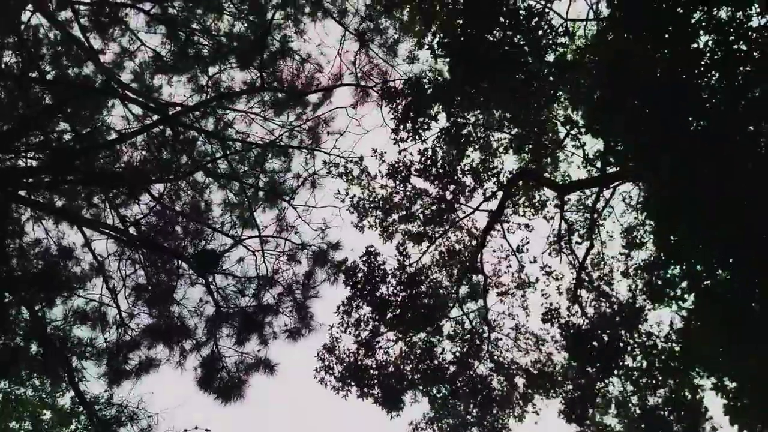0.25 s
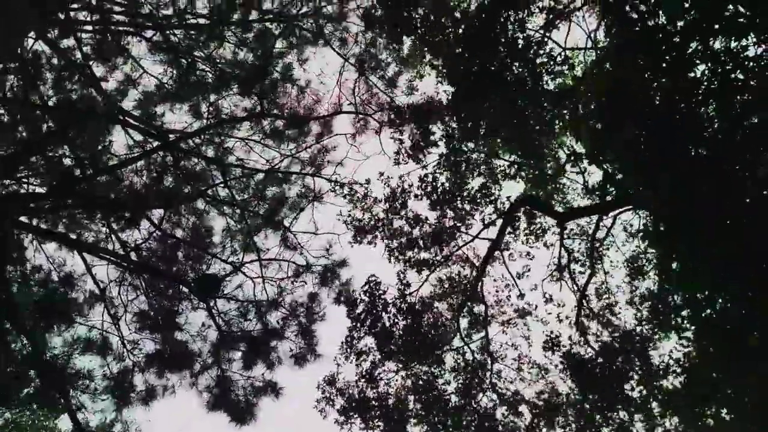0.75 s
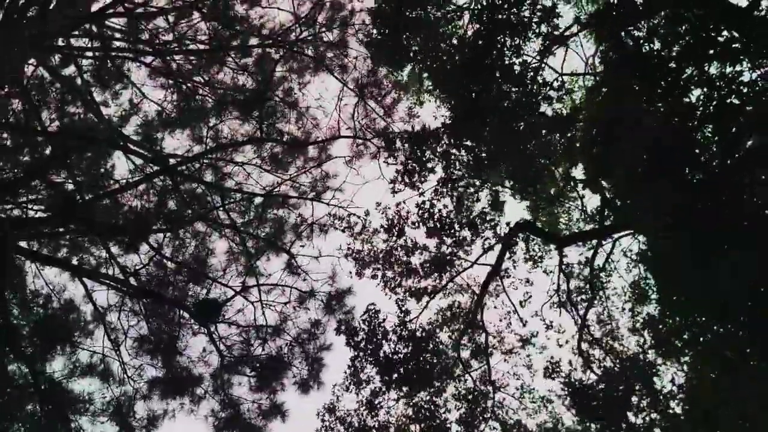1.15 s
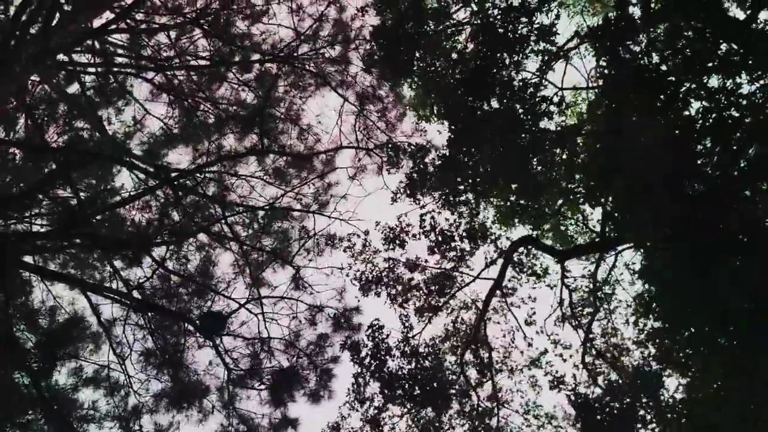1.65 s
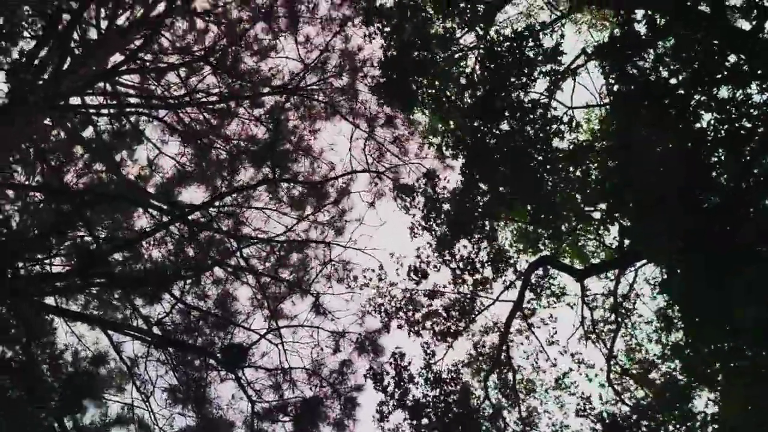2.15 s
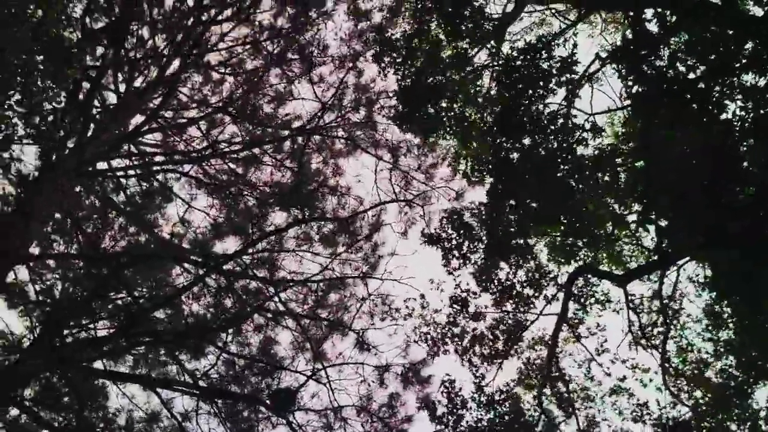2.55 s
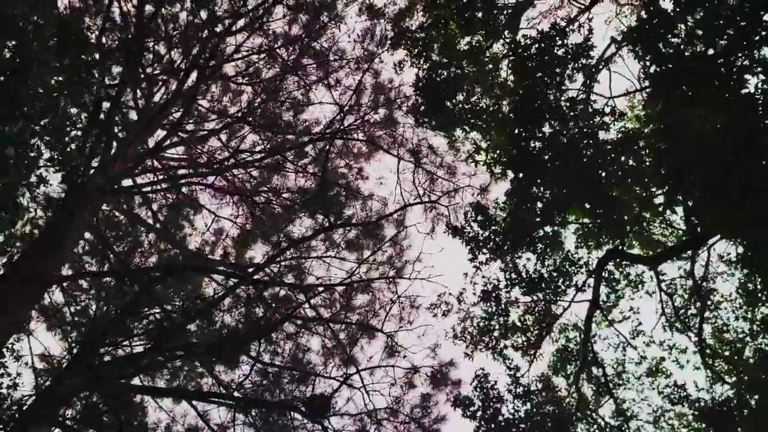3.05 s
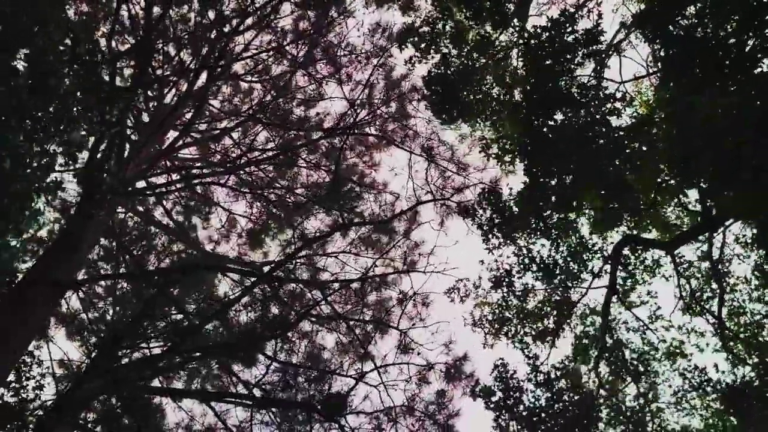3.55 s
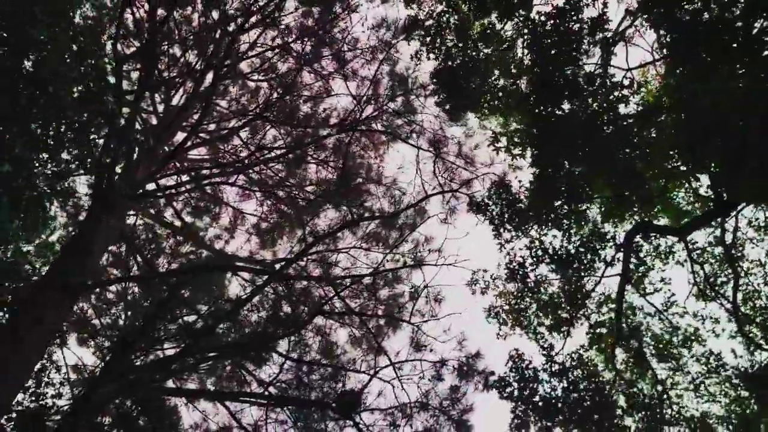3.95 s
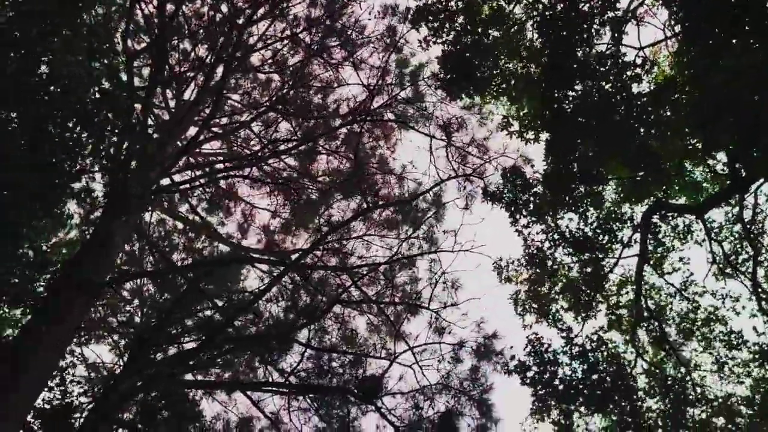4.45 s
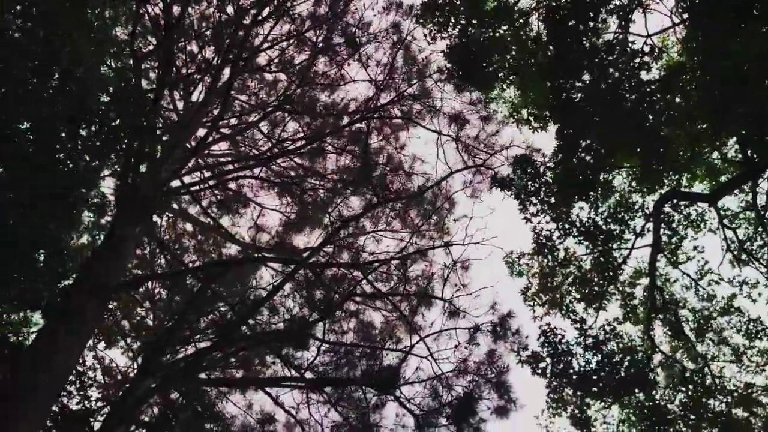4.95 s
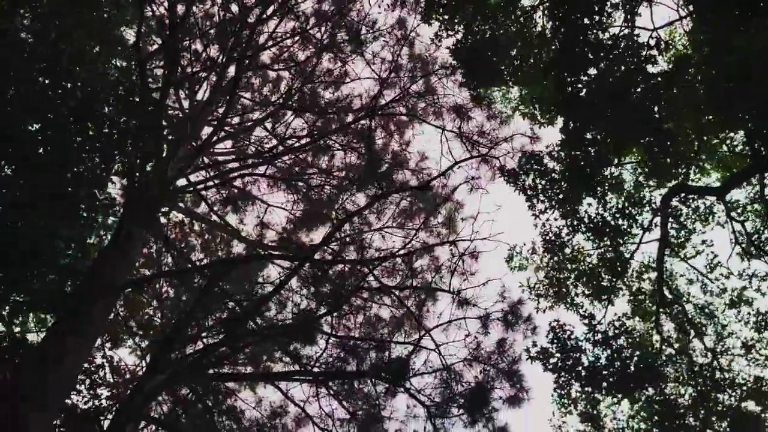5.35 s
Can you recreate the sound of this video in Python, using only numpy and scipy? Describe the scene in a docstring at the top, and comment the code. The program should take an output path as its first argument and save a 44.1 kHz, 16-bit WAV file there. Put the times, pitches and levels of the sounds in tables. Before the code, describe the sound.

A burst of deep, soft wind thumps opens, then thins. Loud dry clicks of raindrops hit the microphone casing at irregular moments, with notable ones near half a second, 1.4, 1.8 and 4 seconds, among fainter pats and tiny ticks. Quiet steady leaf rush surrounds them; the open-air sound is very close and wide, without echo.

```python
"""Storm wind under tall trees, taken from the ground: gusts buffet the two-port microphone and the crowns rush.
Wind is shaped stereo noise: low rumble that swells with each gust, and a broad rush with thin hiss above.
Raindrops land on the recorder's own housing: each is a dry tick, earlier and usually louder at the nearer port,
with a short spray and a ring of the struck panel. Faint fine drops, soft case bumps and one high fizz lie
behind. A fast limiter holds down the loudest moments."""
import sys
import numpy as np
from scipy import signal
from scipy.fft import rfft, irfft, next_fast_len
from scipy.io import wavfile
from scipy.ndimage import uniform_filter1d, minimum_filter1d, map_coordinates

SR = 44100
rng = np.random.default_rng(int(sys.argv[2]) if len(sys.argv) > 2 else 0)


def transcribe(signal):
    """Save signal, clipped to [-1, 1], as a 16-bit WAV file at the path in sys.argv[1]."""
    frames = np.atleast_2d(signal).T
    limited = np.clip(frames, -1, 1)
    pcm = np.round(limited * 32767).astype(np.int16)
    wavfile.write(sys.argv[1], SR, pcm)


N = 247106

# Gusts at the microphone. Each row: crest in seconds, buffeting in dB, length in seconds, left over right in dB.
GUSTS = [(0, -31, 0.11, -5), (0.436, -28.5, 0.1, 6), (0.61, -34.5, 0.18, 3.5), (0.858, -35.5, 0.063, 3),
         (1.035, -47.5, 0.062, 9), (1.803, -43.5, 0.1, 8), (1.954, -31.5, 0.099, 8), (2.464, -42, 0.11, -3),
         (2.724, -38.5, 0.1, 9), (2.935, -42, 0.064, 15), (3.346, -31.5, .085, -5.5), (3.55, -40, 0.069, 0),
         (3.832, -42, 0.1, 12), (5.255, -37.5, 0.054, 7), (5.6, -45, .1, 12)]
# Slowly changing breeze under the gusts. Each row: time in seconds, buffeting in dB.
BREEZE = [(0, -34), (0.28, -44.5), (0.7, -45), (1.15, -48), (1.5, -52.5), (1.8, -44), (2.3, -48),
          (2.9, -45.5), (3.65, -48.5), (4.0, -45.5), (4.2, -53), (5.0, -50.5), (5.6, -44.5)]
# Relative spectrum of the buffeting. Each row: frequency in Hz, density in dB.
BUFFET_SPECTRUM = [(15, -6.5), (25, -4.5), (45, -1.5), (64, 1), (95, -4.5), (125, -9.5), (155, -9.5),
                   (230, -23), (400, -40), (900, -95)]
# Wind up in the crowns. Each row: time in seconds, rush in dB before a fixed lift and a random wobble.
CROWN_LEVELS = [(0.0, -45), (0.5, -47.5), (1.64, -49.5), (2.35, -50.5), (3.9, -47.5), (4.1, -49.5),
                (5.6, -50)]
# Relative spectrum of the rush in the branches. Each row: frequency in Hz, density in dB.
RUSH_SPECTRUM = [(40, -15), (95, -10), (120, 14), (145, -3), (280, -2), (500, -4.5), (690, -1), (870, -4.5),
                 (1180, -2), (1700, -8), (2500, -13.5), (3350, -9.5), (5000, -23.5), (9000, -43.5)]
# Relative spectrum of the thin hiss. Each row: frequency in Hz, density in dB.
HISS_SPECTRUM = [(3000, -51), (6500, -75), (8500, -9.5), (10000, -6.5), (12500, 3.5), (14300, -1),
                 (16000, -1.5)]
# Likeness of the crowns at the two ports. Each row: frequency in Hz, left-right correlation from 0 to 1.
PORT_LIKENESS = [(150, .9), (380, .77), (950, .22), (2400, 0), (15000, 0)]
# Balance of the crowns between the ports. Each row: frequency in Hz, left over right in dB.
PORT_BALANCE = [(150, -0.5), (400, 1), (950, -4.5), (2400, -3.5), (6000, 2.5), (13000, -5)]
# Drops on the housing. Each row: start in seconds, tick level in dB, left over right in dB, lag of the far port
# in ms, brightness in dB per octave, snap in dB, panel ring in Hz, ring in dB relative to the tick level.
DROPS = [(0.1725, -5.5, -8, 0.44, -4.5, 6.5, 397, -50), (0.3718, -19, 18, .3, -1.5, 2, 300, -19),
         (0.379, -11.5, 18, 0.42, -2.5, -11, 766, -14), (0.4895, 8.5, 6.5, .05, 3, -0.5, 448, -20),
         (0.5358, -17, -10, .05, -0.5, -9, 298, -14), (0.684, -13.5, 4, .08, 2.5, 4.5, 290, -18.5),
         (0.8431, 1, 24, 0.28, -2, -8, 700, -17), (0.8837, -10, -4.5, 0.22, 1.5, 3.5, 298, -21),
         (0.9074, -11, -6.5, 0.33, 0, -5, 740, -22), (1.1034, -15, -0.5, 0.22, -1.5, 2, 1220, -5),
         (1.3727, 5.5, 6, 0.53, 0.8, -3, 418, -14.5), (1.6806, -23.5, 6, 0.37, -5, 10, 905, -16),
         (1.7925, 1, 11.5, 0.44, 6.5, -2, 298, -25), (2.1351, -26, 0, 0.29, -5, 3, 1220, 1),
         (2.3358, -18, 14, .05, -2.5, -7, 1510, -39), (2.4268, -4, -7, .05, 4.5, -1.5, 1070, -3.5),
         (2.6385, -18.5, 21, 0.49, -3, -13, 930, -20), (2.852, -6, 7, 0.36, -2.5, 3.5, 775, -21),
         (3.2023, -25, 2, 0.26, 3, -16, 2130, 1.5), (3.6295, -9.5, -12, 0.095, 4, 1.5, 332, -20),
         (3.7793, -25.5, 20, 0.29, 7, 3, 1320, 0.5), (4.0395, -17, 15, 0.18, 6, -10, 1030, 1),
         (4.0544, 2.5, 3.5, 0.6, 2, -2, 508, -3.5), (4.1014, -21, 5, 0.27, -3.5, 0, 1130, -18),
         (4.1478, -12.5, 13, 0.2, -0.5, -7, 655, -15), (4.9338, -25.5, -3.5, 0.26, 6.5, -8, 895, -11),
         (5.2217, -18.5, -6.5, 0.25, 4, -2.5, 1320, -30), (5.3864, -14, 13, 0.57, 0, -6, 333, -15),
         (5.3957, -20.5, 13, 0.4, 0.5, -7, 306, -17.5), (5.4671, -27, 0, 0.26, -6, 2, 1150, 1.5),
         (5.5672, -20.5, 11, 0.2, -3, -27, 2730, -12)]
# The housing's answer to a drop. Each row: frequency in Hz, relative level in dB.
IMPACT_SPECTRUM = [(60, -12), (200, -15), (380, -3), (750, 3.5), (1600, 1), (2300, -6.5), (3300, -8),
                   (4800, -24), (6500, -36.5), (8000, -31), (10000, -43), (12500, -27.5), (16000, -49)]
# Soft bumps of the case. Each row: start in seconds, peak in dB, pitch in Hz.
BUMPS = [(1.301, -34, 316), (3.032, -38.5, 243), (4.524, -42, 275)]


def buffeting():
    """Gusts swell and fade over the breeze, most pressing harder on one port; eddies make the whole flutter."""
    rise, fall = 0.45, 0.54  # shares of a gust's length: it builds faster than it fades
    eddy_db, eddies_per_s = 1.5, 12
    t = np.arange(N) / SR
    breeze_db, = curves(BREEZE)
    power = np.ones((2, 1)) * amp(breeze_db) ** 2
    for crest_s, db, length_s, lean_db in GUSTS:
        width_s = length_s * np.where(t < crest_s, rise, fall)
        swell = np.exp(-((t - crest_s) / width_s) ** 2)
        port_db = db + np.array([[lean_db], [-lean_db]]) / 2
        power = power + swell * amp(port_db) ** 2
    # the lowest rumble is nearly the same at both ports
    rumble = airy(BUFFET_SPECTRUM, [(40, 1.0), (80, 0.98), (150, 0.69)], patchy_db=1.4)
    # level out the rumble's own slow swings, so that gusts, breeze and flutter set its strength
    strength = np.sqrt(np.abs(uniform_filter1d(np.mean(rumble ** 2, axis=0), size=4000)) + 1e-6)
    flutter = amp(eddy_db * wobble(eddies_per_s))
    return rumble / strength * np.sqrt(power) * flutter


def crowns():
    """Branches rush in the wind, with a thin hiss on top that follows the slow course of the rush."""
    hiss_db, hiss_fade_db_per_s = -11, 0.28  # against the rush's slow course; the hiss thins with time
    level_db, = curves(CROWN_LEVELS)
    rush_gain = amp(level_db + 1.5 + 0.57 * wobble(3.7))
    rush = rush_gain * airy(RUSH_SPECTRUM, PORT_LIKENESS, patchy_db=1.38)
    hiss_gain = amp(level_db + hiss_db - hiss_fade_db_per_s * np.arange(N) / SR)
    hiss = hiss_gain * airy(HISS_SPECTRUM, PORT_LIKENESS, patchy_db=0.3)
    sides = np.array([1, -1])[:, None]
    return filtered(rush + hiss, lambda hz: amp(sides * along(PORT_BALANCE, hz) / 2))


def splashes(rows):
    """Each drop reaches the nearer port first, then the far one; the struck panel rings into both."""
    through_case_s = 0.0011
    out = np.zeros((2, N))
    for s, db, lean_db, lag_ms, bright_db, snap_db, ring_hz, ring_db in rows:
        near = int(lean_db < 0)  # 0 is the left port
        later = s + lag_ms / 1000
        add(out[near], s, amp(db) * tick(bright_db, snap_db))
        # the spray reaches both ports alike in level and time
        for port in out:
            add(port, s, amp(db + 0.6 * bright_db - 43) * spatter())
        far = amp(db - abs(lean_db)) * tick(bright_db, snap_db)
        add(out[1 - near], later, far)
        # a slower wave through the case knocks at the far port once more
        add(out[1 - near], s + through_case_s, amp(-14.5) * far)
        panel = amp(db + ring_db) * ring(ring_hz, cycles=3.3)
        # the right port sits closer to the flexing panel
        add(out[0], later, amp(-13.5) * panel)
        add(out[1], later, panel)
    return out


def tick(bright_db, snap_db, size=1024):
    """One impact: fast drops are brighter, direct hits snap in the port, and each spot sounds a little different."""
    hz = np.fft.rfftfreq(size, 1 / SR)
    octaves = np.log2(np.clip(hz, 350, 3500) / 1000)
    port = np.exp(-(np.log2((hz + 1) / 3100) / 0.45) ** 2)  # resonance near 3100 Hz
    knots = np.geomspace(200, 16000, num=24)
    ripple_db = np.interp(hz, knots, rng.normal(0, 1.6, len(knots)))
    return causal(along(IMPACT_SPECTRUM, hz) + bright_db * octaves + snap_db * port + ripple_db)


def spatter(t60=0.011, size=512):
    """The drop bursts into a very short, bright spray: differenced noise that falls 60 dB in t60 seconds."""
    decay = amp(-60 * np.arange(size) / SR / t60)
    return np.diff(rng.standard_normal(size + 1)) * decay


def ring(hz, cycles, size=2048):
    """The case flexes: it swells over about a cycle and dies after a few; the air follows its speed."""
    turns = hz * np.arange(size) / SR
    decay = amp(-60 * turns / cycles)
    bend = np.sin(2 * np.pi * turns) * decay * (1 - np.exp(-turns)) ** 2
    wave = np.gradient(bend)
    return wave / np.abs(wave).max()


def droplets(count=56):
    """Fine drops land on the housing at random moments, most of them very faint."""
    faintest_db, range_db = -36.5, 8.5
    width_db, bright_range_db = 26, 10  # left-right spread; brightness spread per octave
    lowest_hz, range_hz = 500, 900  # panel ring
    rows = []
    for when, weight, side, speed, spot in rng.random((count, 5)):
        db = faintest_db + range_db * weight ** 2
        lean_db = width_db * (side - 0.5)
        lag_ms = abs(side - 0.5)
        bright_db = bright_range_db * (speed - 0.3)
        ring_hz = lowest_hz + range_hz * spot
        rows.append((when * N / SR, db, lean_db, lag_ms, bright_db, 2, ring_hz, -16))
    return splashes(rows)


def bumps():
    """Dull little knocks on the case, each a short ring that is equal at both ports."""
    out = np.zeros(N)
    for s, db, hz in BUMPS:
        add(out, s, amp(db) * ring(hz, cycles=5.0))
    return out


def spit(s=1.6155, db=-41, hz=13900, size=200):
    """One tiny, very high fizz, to the right: a burst of noise kept to a band around hz."""
    out = np.zeros(N)
    add(out, s, np.hanning(size) * rng.standard_normal(size))
    port_gain = amp(db + np.array([[0], [8.5]]))
    return port_gain * filtered(out, lambda f: np.exp(-((f - hz) / 1500) ** 2))


def airy(spectrum, alike, patchy_db):
    """Stereo noise of rms 1 with drifting patches of gain; the ports' likeness varies with frequency."""
    z = signal.stft(rng.standard_normal((2, N)), nperseg=512)[2]
    field = uniform_filter1d(rng.standard_normal(z.shape[1:]), size=5, axis=0)  # smooth over frequency
    field = uniform_filter1d(field, size=16, axis=1)  # and over time
    pair = signal.istft(z * amp(patchy_db * unit(field)))[1][:, :N]

    def mid_side(hz):
        # the share of mid against side sets the left-right correlation
        turn = np.arccos(np.clip(along(alike, hz), -1, 1)) / 2
        return amp(along(spectrum, hz)) * np.array([np.cos(turn), np.sin(turn)])

    mid, side = filtered(pair, mid_side)
    return unit(np.array([mid + side, mid - side]))


def wobble(rate):
    """A smooth random curve, rate knots a second."""
    return map_coordinates(rng.standard_normal(int(N * rate / SR) + 4), [np.arange(N) * rate / SR])


def curves(rows):
    """One value per sample for each column after the time."""
    s, *cols = np.transpose(rows)
    return [np.interp(np.arange(N) / SR, s, c) for c in cols]


def along(points, hz):
    """(Hz, value) points read on a log axis."""
    f, v = np.transpose(points)
    return np.interp(np.log(hz + 1), np.log(f + 1), v)


def causal(db):
    """The minimum-phase impulse that has this spectrum, its energy as early as can be, scaled to peak 1."""
    cepstrum = irfft(np.log(amp(db)))
    half = len(cepstrum) // 2
    fold = np.r_[1, np.full(half - 1, 2), np.zeros(half)]
    pulse = irfft(np.exp(rfft(cepstrum * fold)))
    return pulse / np.abs(pulse).max()


def filtered(x, response):
    """x times a response of frequency."""
    m = next_fast_len(N + SR // 2)
    return irfft(rfft(x, m) * response(np.fft.rfftfreq(m, 1 / SR)), m)[..., :N]


def add(track, s, sound):
    """Mix a sound into a track from time s."""
    room = track[max(0, round(s * SR)):][:len(sound)]
    room += sound[:len(room)]


def amp(db):
    """Decibels to gain."""
    return 10 ** (np.asarray(db) / 20)


def unit(x):
    """Scaled to rms 1."""
    return x / np.sqrt(np.mean(x ** 2) + 1e-20)


def scene():
    """Wind around, rain on the recorder."""
    return buffeting() + crowns() + splashes(DROPS) + droplets() + bumps() + spit()


def record(dry):
    """A fast limiter holds peaks under full scale; the microphone has a treble dip and band limits."""
    ceiling = 0.9
    needed = ceiling / np.maximum(np.abs(dry), ceiling)
    limited = dry * uniform_filter1d(minimum_filter1d(needed, size=15), size=15)
    dip_db, dip_hz, width_hz = -16.0, 7786, 1105
    low_hz, top_hz = 23.5, 15900

    def microphone(hz):
        dip = amp(dip_db * np.exp(-((hz - dip_hz) / width_hz) ** 2))
        return dip * hz ** 2 / np.hypot(hz ** 2, low_hz ** 2)

    coloured = filtered(limited, microphone)
    # a very steep cut at the top of the band
    return filtered(coloured, lambda hz: 1 / np.sqrt(1 + (hz / top_hz) ** 200))


dry = scene()
out = record(dry)
transcribe(out)
```